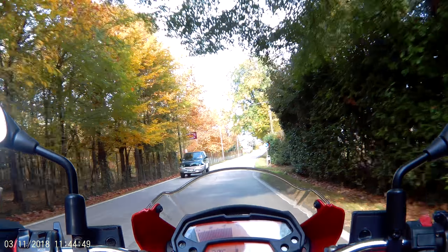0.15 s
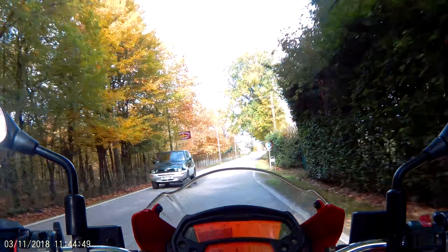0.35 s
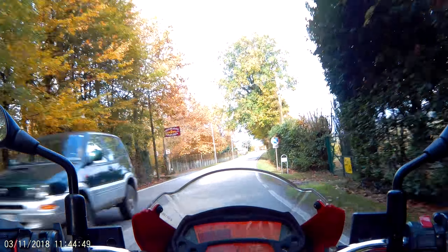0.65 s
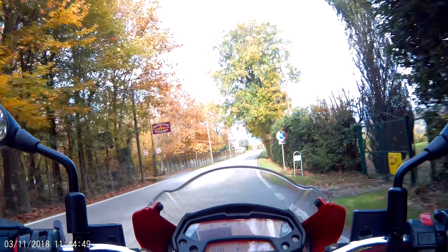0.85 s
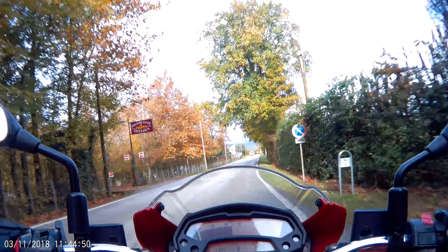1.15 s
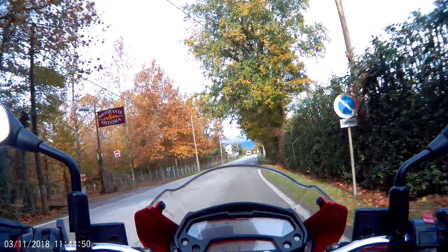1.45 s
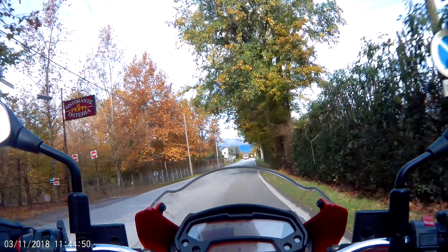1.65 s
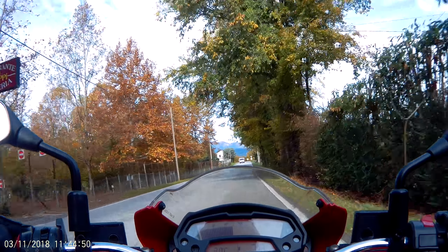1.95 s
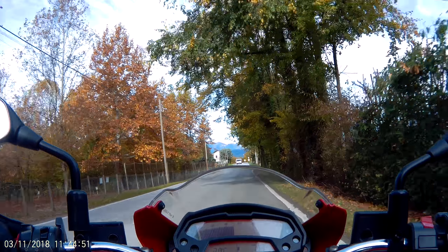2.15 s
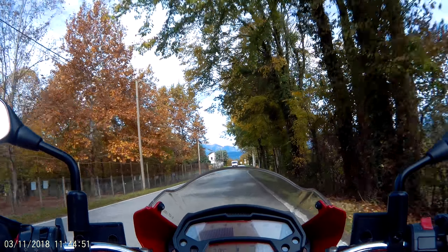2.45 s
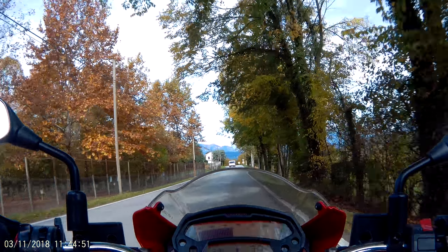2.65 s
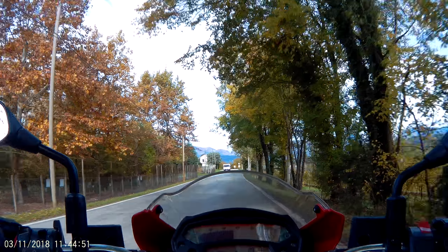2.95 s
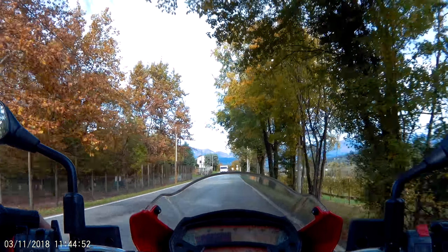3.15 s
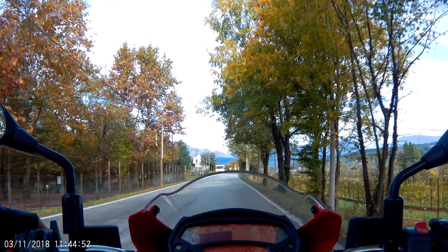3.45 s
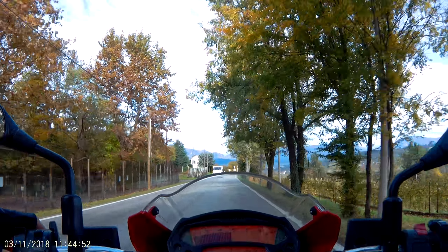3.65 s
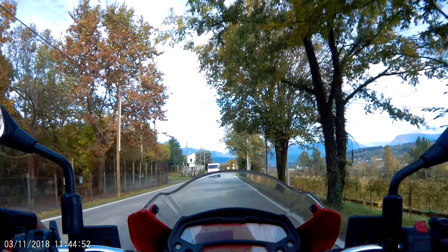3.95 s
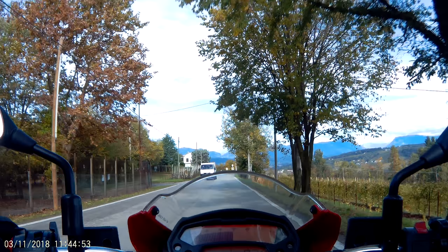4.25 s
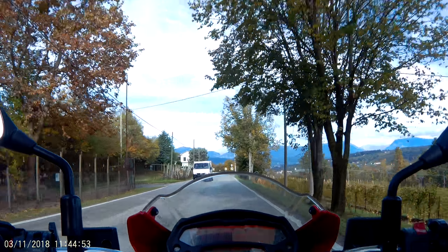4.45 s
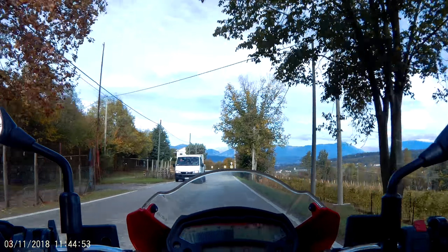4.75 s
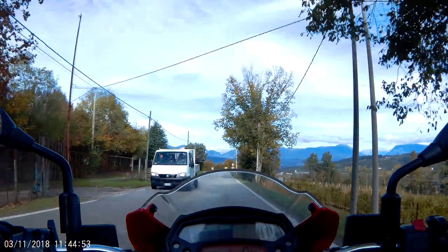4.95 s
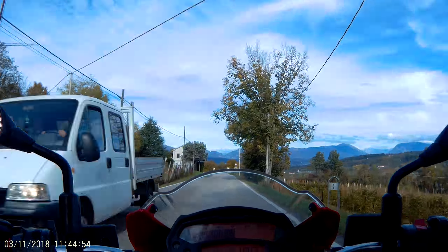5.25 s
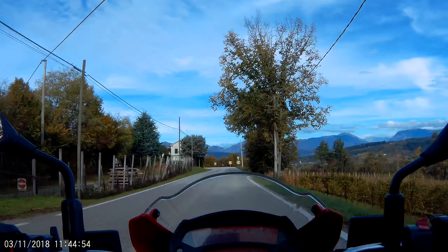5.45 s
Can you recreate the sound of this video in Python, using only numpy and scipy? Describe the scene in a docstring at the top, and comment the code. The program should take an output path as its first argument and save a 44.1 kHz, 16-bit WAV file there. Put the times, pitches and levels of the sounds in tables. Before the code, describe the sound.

A twin-cylinder motorcycle is heard from the rider's seat on an open road. For the first second it coasts: a low, slightly rough exhaust boom, wavering gear whirr, clatter and fine valve ticks, the pitch sagging a little. Around 1.1-1.3 s the exhaust thins and a short, low thump marks the drive taking up slack. From about 1.7 s the engine pulls, its buzzing drone climbing smoothly while successive tones swell and fade. Intake gulps turn into a raspy growl, flaring unevenly around 2 s and 3.5-4.2 s, and wind and tyre rush thicken with low buffeting. A thin metallic whine flares near 4.6 s. By 5 s the snarl is full, loud and spitting. At about 5.2 s an oncoming truck whooshes past in a brief mid-toned burst; the throttle shuts immediately afterwards, the pitch drops, and a wavering, quieter drone remains until 5.6 s. Peaks are gently limited.

```python
"""A twin-cylinder motorcycle on a country road, heard from the rider's seat: coasting, a steady pull, throttle shut.
The exhaust drones on multiples of the four-stroke cycle and the intake gulps, rasps and growls;
as the revs climb, one tone after another swells on a fixed resonance.
Valves tick, gears sing, clatter and wind grow with speed, and a metal whine flares now and then.
Near the end a small truck shoots past the other way; a limiter rounds the highest peaks."""
import sys
import numpy as np
from scipy import signal
from scipy.fft import rfft, irfft
from scipy.io import wavfile
from scipy.ndimage import uniform_filter1d, minimum_filter1d

SR = 44100
rng = np.random.default_rng(int(sys.argv[2]) if len(sys.argv) > 2 else 0)


def put_to_file(sound):
    """Save the sound as 16-bit audio at rate SR, in the file named by the first command-line argument."""
    columns = np.atleast_2d(sound).T  # one column per channel
    safe = np.clip(columns, -1, 1)
    whole_steps = np.round(safe * 32767)
    wavfile.write(sys.argv[1], SR, whole_steps.astype(np.int16))


N = 246519
TIME = np.arange(N) / SR  # s
FREQ = np.arange(N // 2 + 1) * SR / N + 1e-3  # Hz, kept just above zero for the divisions

# engine speed (time [s], four-stroke cycles per second, half the crank speed [Hz])
CYCLE_RATE = [(0.0, 42.13), (0.3, 41.4), (0.82, 40.3), (1.02, 40.7), (1.17, 40.37), (1.7, 40.93),
              (1.9, 41.65), (2.25, 42.97), (2.6, 43.84), (3.0, 45.4), (3.4, 47.16), (3.7, 48.46),
              (4.1, 49.52), (4.5, 50.36), (4.75, 51.66), (5.0, 52.9), (5.22, 54.44), (5.31, 51.6),
              (5.42, 52.9), (5.59, 52.5)]
# how hard the engine draws air (time [s], intake level [dB])
THROTTLE = [(0, -39), (1.04, -39), (1.1, -34), (1.72, -33), (1.83, -30), (2.27, -30), (2.55, -31.5),
            (2.76, -28), (3.05, -28), (3.5, -26), (4.2, -24), (4.55, -23.5), (4.75, -22.5), (5.235, -20.5),
            (5.26, -28), (5.59, -31)]
CRUISE_HZ = 45  # cycle rate at cruising revs
COAST_MIDDLE_S, COAST_RELEASE_S = 0.99, 0.23  # middle and length of the fade from coasting to pulling

# tones fed to the exhaust pipe (multiple of the cycle rate, level pulling [dB], level coasting [dB])
EXHAUST_TONES = [(2, -30, -43), (3, -38.5, -39), (4, -19.5, -25.5), (5, -30.5, -48), (6, -30, -21),
                 (7, -38.5, -31.5), (8, -29, -33.5)]
# exhaust pipe resonances (frequency [Hz], width [Hz], gain [dB])
PIPE = [(98.4, 11.9, -10.5), (206.7, 20.6, -0.5), (235.8, 7, -11), (271, 10.4, -21.5), (313.3, 20.6, -6.5),
        (375, 45, -8)]
# brief dips and surges of the fourth-multiple boom (time [s], spread [s], change [dB])
BOOM_CHANGES = [(0.02, 0.033, 3), (0.29, 0.053, -9), (0.45, 0.027, -5), (0.87, 0.044, -5),
                (1.593, 0.76, -4), (1.83, 0.029, 0.5), (1.96, 0.04, -8), (2.13, 0.065, 1),
                (2.508, 0.12, -0.5), (2.793, 0.08, 3), (4.03, 0.07, 1.5), (4.11, 0.019, -1),
                (4.742, 0.06, -4.5), (4.87, 0.024, -4.5), (5.205, 0.024, -1.5), (5.35, 0.085, 2),
                (5.361, 0.012, -15), (5.468, 0.023, -13.5)]
COAST_ROUGH_DB = 1.3
# between coasting and pulling the unloaded exhaust falls quiet
UNLOADED_S, UNLOADED_SPREAD_S, UNLOADED_DEPTH_DB = 1.266, 0.2, 11.5
# the pipe's own ring under uneven firings (frequency [Hz], width [Hz], relative level [dB])
FLUTTER_MODE = [(208, 22, 0)]
FLUTTER_DB = -15  # relative to the intake level

# standing waves in the intake tract (frequency [Hz], width [Hz], relative level [dB])
STANDING = [(433, 250, -17.5), (533.4, 7.6, -4.5), (566.7, 48, -3.5), (600, 50, -13.5), (674, 31, 0.5),
            (762, 58, 2.5), (798, 5.3, 4.5), (890.3, 27, 2), (945.6, 34.6, 2), (1010, 19, -13),
            (1074, 76, 0), (1171, 60, -2.5), (1286, 120, -20.5), (1424, 56, -21)]
# short, damped resonances of the intake throats (frequency [Hz], width [Hz], relative level [dB])
SNARL = [(1390, 66, 1.5), (1461, 29, 0.5), (1540, 16, 0), (1693, 73, 5.5), (1740, 90, 0.5),
         (2120, 250, -8.5)]
RASP_DB = -13.7  # rush of air in each stroke, relative to the intake level
STROKE_SCATTER_DB = 2
# brief flares and falters of growl and rasp (time [s], spread [s], change [dB])
GROWL_CHANGES = [(1.84, 0.041, 4), (2.03, 0.01, 3), (2.135, 0.016, 3), (2.77, .05, 0), (3.48, 0.037, 3),
                 (3.885, 0.026, 1), (3.945, 0.015, -5), (4.03, .03, 1), (4.095, 0.016, -5),
                 (4.17, 0.034, 1.5), (4.285, 0.023, 0.5), (4.72, .03, 0), (5.04, .015, 3.5)]
# engine tones feeding the standing waves, before the overall growl trim
# (multiple of the cycle rate, level at light [dB], half [dB] and wide throttle [dB])
GROWL_TONES = [(9, -26, -37.5, -20), (10, -35, -37.5, -34.5), (11, -40, -34.5, -25.5),
               (12, -45, -31, -23.5), (13, -47, -34, -46), (14, -57, -37, -26.5), (15, -45, -41, -39),
               (16, -73, -31.5, -31.5), (17, -45.5, -47.5, -39), (18, -65, -30.5, -37),
               (19, -55, -30.5, -32.5), (20, -38.5, -34, -40.5), (21, -44, -36, -32.5),
               (22, -44.5, -39.5, -34.5), (23, -51, -36, -30), (24, -43.5, -40.5, -39), (25, -69, -55, -28),
               (26, -49, -32.5, -34), (27, -50, -42, -43), (28, -62, -35, -42), (29, -48.5, -34, -30)]
# what counts as light, half and wide throttle (intake level [dB])
OPENINGS_DB = [-36, -25, -21]
GROWL_DB, GROWL_SWAY_DB = 2.5, .7
GROWL_LAG_TURNS = .2  # delay after each gulp, share of a cycle
GROWL_SMEAR_RAD, GROWL_SPREAD_RAD = .75, .08  # chance phase, and phase bend that makes high tones later
# hiss of the spit at each gulp (frequency [Hz], density relative to the intake level [dB per Hz])
SPIT = [(1500, -81), (3000, -56), (5000, -74.5), (11000, -86.5), (15000, -100)]
SPIT_SCATTER_DB = 2.2

# crank and gear tones when coasting, before the trim (multiple of the cycle rate, level [dB])
WHIRR_TONES = [(9, -49.5), (10, -45), (11, -60), (13, -46), (14, -49), (15, -50), (16, -48.5), (17, -45.5),
               (18, -41.5), (19, -44), (20, -50), (21, -42), (22, -43), (23, -49), (24, -53), (25, -40.5),
               (26, -47), (28, -57), (29, -51), (30, -51), (31, -57), (36, -55.5)]
WHIRR_DB = 2  # trim
# engine casing and fairing resonances (frequency [Hz], width [Hz], relative level [dB])
CASING = [(377, 495, -12.5), (534, 88, -8.5), (751, 86, -4.5), (929, 93, 0.5), (1138, 50, -3),
          (2620, 540, -30.5), (2980, 190, -28.5)]
CLATTER_DB, CLATTER_DB_PER_OCTAVE = -35.3, 5  # at cruising revs, and growth per doubling of speed
# valves snap shut (share of the cycle, relative level [dB])
VALVES = [(.11, -1), (.58, -1.5), (.82, -3.5)]
# what they ring in the cylinder head (frequency [Hz], width [Hz], relative level [dB])
HEAD = [(2470, 80, -0.5), (2613, 73, 4), (2845, 90, -6), (3093, 80, -8.5), (4030, 120, -19.5),
        (4500, 106, -22.5)]
VALVE_DB, VALVE_DB_PER_OCTAVE = -45.3, 5
# the dry tick of the valves (frequency [Hz], density at cruising revs [dB per Hz])
TICK = [(1500, -118), (4000, -101), (7000, -106), (10000, -124), (15000, -140)]
TICK_DB_PER_OCTAVE, TICK_TURNS, TICK_SCATTER_DB = 18, .09, 1.5  # TICK_TURNS: decay, share of a cycle
# gear teeth meshing out of step with the firings (multiple of the cycle rate)
MESH = [12.16, 22.7]
# the gearbox resonance that each mesh tone crosses (frequency [Hz], width [Hz], level [dB])
GEARBOX = [(550, 33, -40), (1080, 230, -45)]
WHINE_DB, WHINE_SWAY_DB = -49, 1
# flares of the metallic whine (time [s], spread [s], level [dB])
WHINE_FLARES = [(0.15, 0.02, -48), (1.06, 0.017, -47), (3.8, 0.0068, -45), (4.64, 0.022, -38.5),
                (5, 0.12, -44), (5.44, 0.017, -45), (5.56, 0.056, -46)]
# the drive takes up its slack with a low thump (time [s], spread [s], level [dB])
TAKE_UP = [(1.152, 0.016, -32.5)]

# wind and tyre noise (frequency [Hz], density relative to the rush level [dB per Hz])
RUSH = [(20, -29), (130, -10.5), (450, -18.5), (560, -9.5), (750, -8.5), (1170, -11.5), (1370, -18),
        (2100, -25), (2950, -18), (3350, -36), (4500, -32), (5500, -40.5), (6800, -39), (10000, -50),
        (15000, -62)]
RUSH_DB, RUSH_DB_PER_OCTAVE = -56.5, 24.5
BUFFET_DB, BUFFET_DB_PER_OCTAVE, BUFFET_SWAY_DB = -48.5, 23, 2.5
# thumping eddies (time [s], spread [s], level [dB])
GUSTS = [(.86, 0.053, -51), (1.16, 0.11, -49), (2.97, 0.07, -48)]
# the oncoming truck (time [s], half duration [s], level [dB])
PASSING = [(5.2, 0.066, -24.5)]
TOP_HZ = 15600  # upper edge of the final sound


def undb(db):
    """Decibels to gain."""
    return 10 ** (np.asarray(db) / 20)


def unit(x):
    """Scale to rms 1."""
    return x / np.sqrt(np.mean(x ** 2))


def curves(table):
    """The columns of a time table, one value per sample."""
    s, *columns = np.transpose(table)
    return [np.interp(TIME, s, c) for c in columns]


def walk(rate):
    """Smooth chance with spread 1, changing about rate times a second."""
    return unit(irfft(rfft(rng.standard_normal(N)) / (1 + (FREQ / rate) ** 2), N))


def bump(s, spread):
    """A smooth bell-shaped rise and fall around time s."""
    return np.exp(-.5 * ((TIME - s) / spread) ** 2)


def bumps(table):
    """The summed gain of (time, spread, level) events."""
    return sum(undb(db) * bump(s, spread) for s, spread, db in table)


def changes(table):
    """The summed change in dB of (time, spread, change) events."""
    return sum(db * bump(s, spread) for s, spread, db in table)


def response(at, modes):
    """Complex gain of resonances at the given frequencies; neighbours swing in opposite directions."""
    total = 0
    for k, (hz, width, db) in enumerate(modes):
        total = total + (-1) ** k * undb(db) / (1 + 1j * (at ** 2 - hz ** 2) / (at * width))
    return total


def ring(x, modes):
    """Pass x through resonances with muffled treble, then scale to rms 1."""
    muffle = 1 / (1 + (FREQ / 4500) ** 4)
    return unit(irfft(rfft(x) * response(FREQ, modes) * muffle, N))


def noise(spectrum):
    """Noise whose density follows (frequency, dB per Hz) points on a log frequency axis."""
    hz, db = np.transpose(spectrum)
    shape = undb(np.interp(np.log(FREQ), np.log(hz), db))
    return irfft(rfft(rng.standard_normal(N)) * shape, N) * np.sqrt(SR / 2)


def pulses(cycle, share, scatter_db, jitter_s):
    """One pulse per cycle at the given share of it, each with its own size and timing."""
    chance = rng.standard_normal(size=(400, 2))
    turns = np.arange(1, int(cycle[-1]))
    seconds = np.interp(turns + share, cycle, TIME) + jitter_s * chance[turns, 0]
    at = np.clip(seconds, 0, TIME[-1] - 2 / SR) * SR
    size = undb(scatter_db * chance[turns, 1])
    i = at.astype(int)
    # split each pulse over two samples to place it between them
    return np.bincount(i, size * (1 - at + i), N) + np.bincount(i + 1, size * (at - i), N)


def gate(phase, length):
    """A burst that dies away after each wrap of the phase."""
    return unit(np.exp(-(phase % 1) / length))


def octaves():
    """Speed in doublings above cruising revs."""
    return np.log2(curves(CYCLE_RATE)[0] / CRUISE_HZ)


def coasting():
    """1 while the wheel drives the engine, 0 once the engine pulls."""
    return np.clip(.5 + (COAST_MIDDLE_S - TIME) / COAST_RELEASE_S, 0, 1)


def exhaust(cycle):
    """Low multiples of the cycle rate boom as the revs carry them onto pipe resonances."""
    rate, coast = curves(CYCLE_RATE)[0], coasting()
    out = 0
    for k, pull_db, coast_db in EXHAUST_TONES:
        waver_db = .7 * walk(20) + changes(BOOM_CHANGES) if k == 4 else 1.5 * walk(8)
        waver_db = waver_db + COAST_ROUGH_DB * coast * walk(25)
        level_db = pull_db + (coast_db - pull_db) * coast + waver_db
        gain = undb(level_db) * np.abs(response(k * rate, PIPE))
        out = out + gain * np.sin(2 * np.pi * (k * cycle + rng.random()))
    dip_db = -UNLOADED_DEPTH_DB * bump(UNLOADED_S, UNLOADED_SPREAD_S)
    return np.sqrt(2) * out * undb(dip_db)


def flutter():
    """Noise rings the pipe at its own pitch, which beats against the boom."""
    pipe_ring = ring(ring(rng.standard_normal(N), FLUTTER_MODE), FLUTTER_MODE)
    return undb(curves(THROTTLE)[0] + FLUTTER_DB) * pipe_ring


def stroke(cycle):
    """One smooth swell of air per cycle, fading to nothing before the next, with drifting strength."""
    swell = 1 + np.cos(2 * np.pi * (cycle - GROWL_LAG_TURNS))
    return unit(swell * undb(STROKE_SCATTER_DB * walk(20)))


def intake(cycle):
    """Two cylinders gulp at uneven intervals, one much louder; air rasps through the open valves."""
    loud_gulps = pulses(cycle, 0, scatter_db=1, jitter_s=.00002)
    soft_gulps = pulses(cycle, 1 / 4, scatter_db=2, jitter_s=.00005)
    bursts = gate(cycle, length=.2) * rng.standard_normal(N)
    flow = unit(loud_gulps + .3 * soft_gulps) + .14 * bursts
    throttle_db = curves(THROTTLE)[0]
    # the wider the throttle, the sharper each gulp: the throats snarl and hiss
    sharp = undb(-15.0 + 0.71 * (throttle_db + 23.5))
    hiss = ring(bursts, [(4300, 2000, 1.0), (7000, 1900, -2)])
    snarl = sharp * (ring(flow, SNARL) + undb(-22) * hiss)
    rasp = undb(RASP_DB + changes(GROWL_CHANGES)) * ring(stroke(cycle) * rng.standard_normal(N), STANDING)
    return undb(throttle_db) * (rasp + snarl)


def whirr(cycle):
    """While the wheel drives the engine, crank and gears sing in tones that waver slowly."""
    tones = 0
    for k, db in WHIRR_TONES:
        gain = undb(db + 1.5 * walk(3))
        tones = tones + gain * np.sin(2 * np.pi * (k * cycle + rng.random()) + .15 * walk(9))
    return undb(WHIRR_DB) * coasting() * tones


def clatter(cycle):
    """Pistons rattle once a crank turn over the steady churn of the cam chain, harder with revs."""
    force = (1.0 + .5 * gate(2 * cycle, length=0.82)) * rng.standard_normal(N)
    level_db = CLATTER_DB + CLATTER_DB_PER_OCTAVE * octaves() + 1.2 * walk(4.7)
    return undb(level_db) * ring(force, CASING)


def valves(cycle):
    """Valves shut at fixed points of the cycle: each ticks and rings the cylinder head."""
    taps = sum(undb(db) * pulses(cycle, share, scatter_db=2.5, jitter_s=.00002) for share, db in VALVES)
    bursts = unit(sum(undb(db) * gate(cycle - share, TICK_TURNS) for share, db in VALVES))
    tick_db = TICK_DB_PER_OCTAVE * octaves() + TICK_SCATTER_DB * walk(40)
    ticks = noise(TICK) * bursts * undb(tick_db)
    return undb(VALVE_DB + VALVE_DB_PER_OCTAVE * octaves()) * ring(taps, HEAD) + ticks


def gears(cycle):
    """Mesh tones follow the revs and beat against the nearest engine tones."""
    rate = curves(CYCLE_RATE)[0]
    tones = 0
    for k, mode in zip(MESH, GEARBOX):
        gain = np.abs(response(k * rate, [mode])) * undb(0.81 * walk(17))
        tones = tones + gain * np.sin(2 * np.pi * k * cycle + 0.6 * walk(2.4))
    return np.sqrt(2) * tones


def whine():
    """Noise through two narrow resonances: a restless metal ring that flares now and then."""
    gain = undb(WHINE_DB + WHINE_SWAY_DB * walk(4.2)) + bumps(WHINE_FLARES)
    return gain * ring(ring(rng.standard_normal(N), [(2692, 88, 0)]), [(2452, 125, 0)])


def air(cycle):
    """Wind and tyres rush louder with speed, hissing a little on each crank turn; eddies thump low."""
    rush_db = RUSH_DB + RUSH_DB_PER_OCTAVE * octaves() + .5 * walk(1.8)
    rush = noise(RUSH) * unit(2.8 + 0.24 * gate(2 * cycle, length=0.051)) * undb(rush_db)
    buffet_db = BUFFET_DB + BUFFET_DB_PER_OCTAVE * octaves() + BUFFET_SWAY_DB * walk(4.7)
    buffet = undb(buffet_db) + bumps(GUSTS)
    return rush + buffet * ring(rng.standard_normal(N), [(23.8, 28, 0)])


def growl(cycle):
    """Throttle-driven engine tones swell on standing waves and add up after each gulp, high ones last."""
    rate, throttle_db = curves(CYCLE_RATE)[0], curves(THROTTLE)[0]
    standing = sum(undb(db) / (1 + ((FREQ - hz) / width) ** 2) ** 2 for hz, width, db in STANDING)
    tones = 0
    for k, *levels_db in GROWL_TONES:
        level_db = np.interp(throttle_db, OPENINGS_DB, levels_db) + walk(7.5)
        angle = 2 * np.pi * k * (cycle - GROWL_LAG_TURNS) + GROWL_SMEAR_RAD * rng.standard_normal()
        angle = angle - GROWL_SPREAD_RAD * (k - 19) ** 2
        tones = tones + undb(level_db) * np.interp(k * rate, FREQ, standing) * np.sin(angle)
    trim_db = GROWL_DB + changes(GROWL_CHANGES) + GROWL_SWAY_DB * walk(18.0)
    return undb(trim_db) * (1 - coasting()) * tones


def thump():
    """The frame hums at 202 Hz for a moment as the drive takes up its slack."""
    return np.sqrt(2) * bumps(TAKE_UP) * np.sin(2 * np.pi * 202 * TIME)


def spit(cycle):
    """Under a wide throttle each gulp starts with a short spit of air, each of its own strength."""
    throttle_db = curves(THROTTLE)[0]
    wide = np.clip((throttle_db + 26.5) / 5, 0, 1)
    size_db = SPIT_SCATTER_DB * rng.standard_normal(size=400)[cycle.astype(int)]
    return noise(SPIT) * gate(cycle, length=0.36) * wide * undb(throttle_db + size_db)


def traffic():
    """The tyre noise of the oncoming truck swells and fades as it shoots past."""
    swell = sum(undb(db) / (1 + ((TIME - s) / half) ** 2) for s, half, db in PASSING)
    return swell * ring(rng.standard_normal(N), [(558, 163, 20.0), (715, 195, 23.0), (1080, 310, -14)])


def scene():
    """One crank angle, in cycles with a slight wander, drives the engine sounds; the rest is mixed in."""
    cycle = .58 + np.cumsum(curves(CYCLE_RATE)[0] * (1 + .0005 * walk(8))) / SR
    gas = exhaust(cycle) + flutter() + intake(cycle) + growl(cycle) + spit(cycle)
    metal = whirr(cycle) + clatter(cycle) + valves(cycle) + gears(cycle) + whine() + thump()
    return (gas + metal + air(cycle) + traffic())[None]


def record(dry):
    """A limiter turns the sound down around each high peak; then a steep low-pass cuts the top."""
    ceiling, hold = .235, int(.006 * SR)  # peak amplitude, samples
    room = np.minimum(1, ceiling / (np.abs(dry[0]) + 1e-9))
    gain = uniform_filter1d(minimum_filter1d(room, size=hold), size=hold)
    low_pass = signal.ellip(8, .2, 70, TOP_HZ, fs=SR, output="sos")
    return signal.sosfilt(low_pass, dry * gain)


dry = scene()
out = record(dry)
put_to_file(out)
```